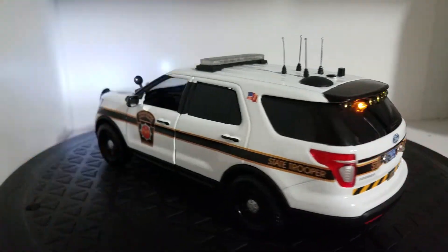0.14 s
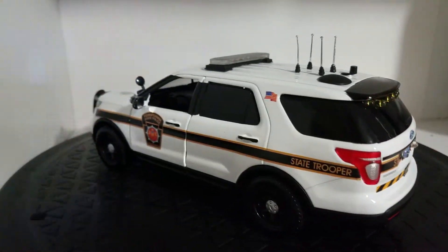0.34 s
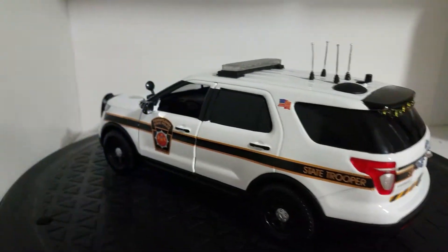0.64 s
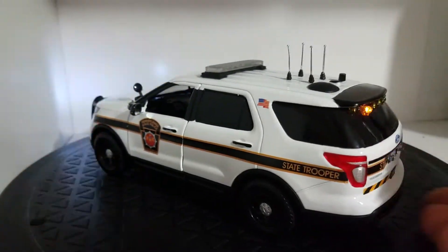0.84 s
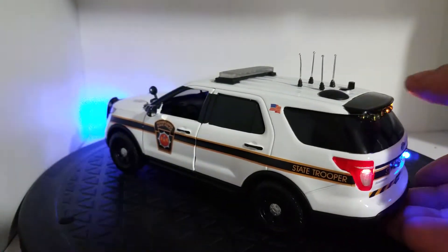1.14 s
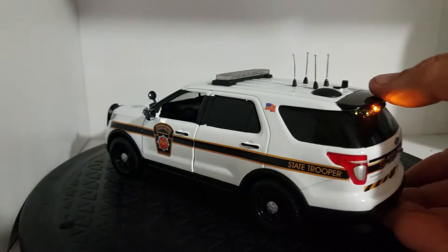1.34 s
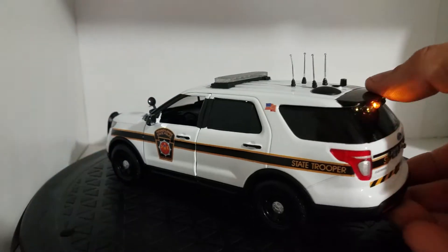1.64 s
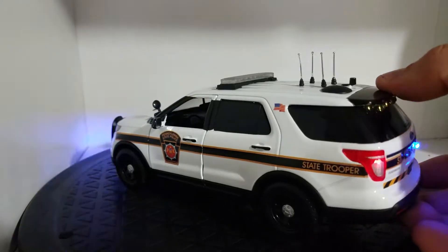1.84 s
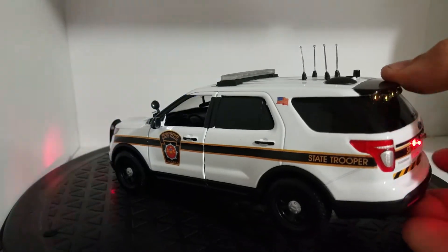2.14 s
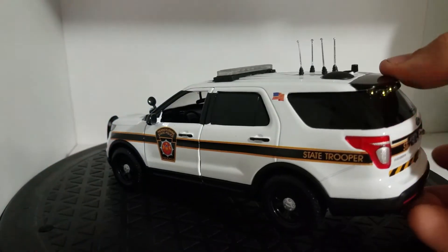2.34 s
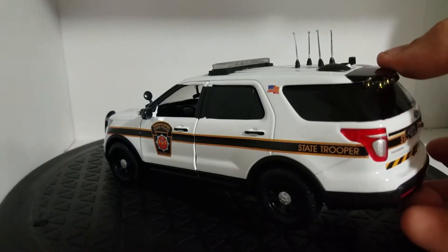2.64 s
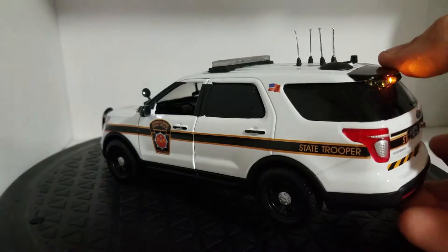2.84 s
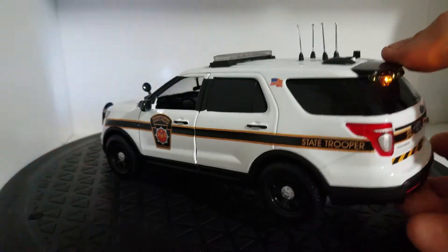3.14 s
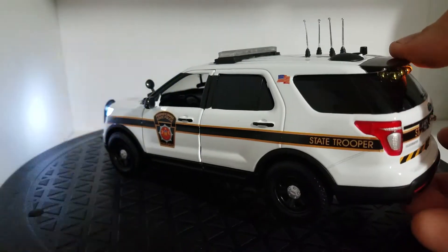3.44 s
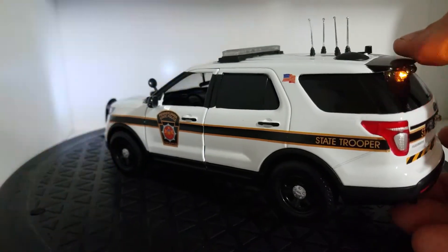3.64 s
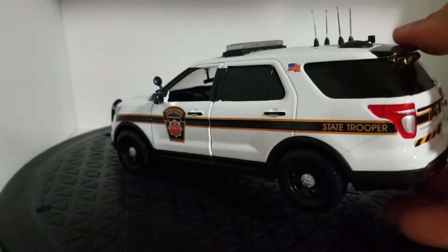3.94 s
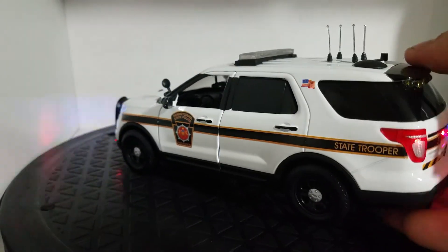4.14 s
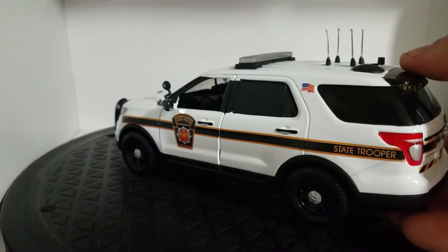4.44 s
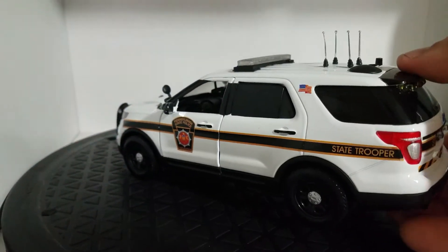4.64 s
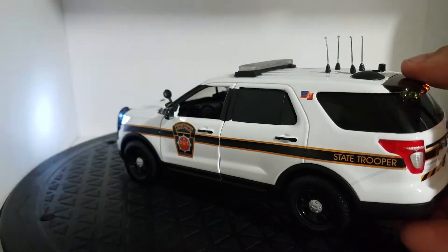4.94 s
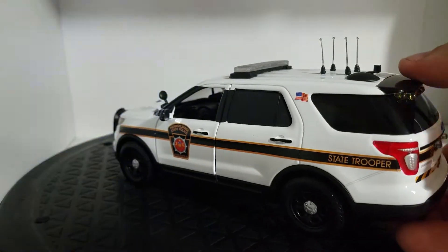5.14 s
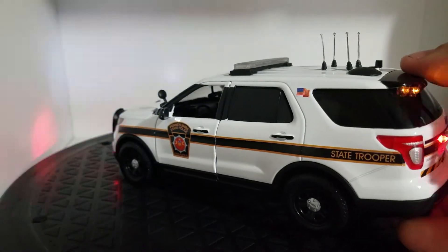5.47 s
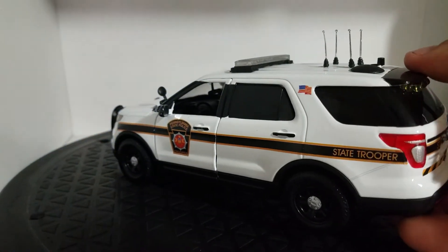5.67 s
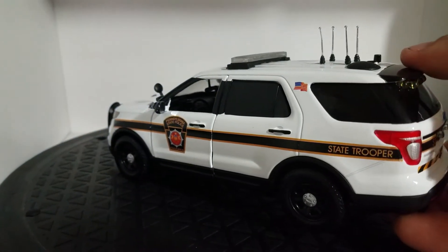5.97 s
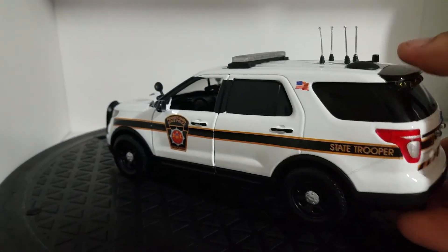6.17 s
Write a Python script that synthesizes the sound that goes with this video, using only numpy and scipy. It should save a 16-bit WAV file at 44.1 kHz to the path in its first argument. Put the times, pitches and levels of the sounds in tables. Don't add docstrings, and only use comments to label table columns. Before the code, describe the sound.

A quiet room with soft low hum and faint hiss, heard by close stereo microphones. From 0 to 0.4 s a plastic toy car is turned on its base: dull rumbling rubs, a light thud and tiny fingertip taps. Around 0.9-1.1 s there is another rub and a firmer wheel bump; at 1.3 s comes a sharp cluster of knocks on the hollow shell. Light taps and creaks follow from 1.5 to 2.1 s. Then a small dome button snaps in press-and-release pairs: 2.22 and 2.41, 2.75 and 2.94, 3.24 and 3.38, 3.86 and 4.04, 4.74 and 4.89, 5.51 and 5.63 s. Each is crisp, bright and very short, with a tiny double contact, hollow plastic ring and tight box echo. Small creaks, taps and rubs surround the presses. At about 6.2 s a soft tap, bump and rub close the handling.

```python
import sys
import numpy as np
from scipy import signal
from scipy.fft import rfft, irfft, next_fast_len
from scipy.io import wavfile

SR = 44100
rng = np.random.default_rng(int(sys.argv[2]) if len(sys.argv) > 2 else 0)


def rack_gain(trim_db):
    fader = np.asarray(trim_db, float)
    return 10 ** (fader / 20)


def transcribe(u):
    v = np.clip(np.atleast_2d(u).T, -1, 1)
    q = np.round(v * 32767).astype(np.int16)
    wavfile.write(sys.argv[1], SR, q)


N = 278271
RUN_IN = 8820


def rms_one(x):
    return x / np.sqrt(np.mean(x ** 2) + 1e-20)


def at_hz(points, hz):
    table_hz, value = np.array(points)[:, 0], np.array(points)[:, 1]
    return np.interp(np.log(hz), np.log(table_hz), value)


def drift(rate):
    return np.interp(np.arange(N) / SR * rate, np.arange(400), rng.standard_normal(400))


def bands(white, lowest=0):
    edges = 22 * 2 ** (np.arange(lowest, 30) / 3)
    white = np.concatenate([white[..., -RUN_IN:], white], axis=-1)
    for k, (low, high) in enumerate(zip(edges, edges[1:])):
        band_pass = signal.butter(2, [low, high], "band", fs=SR, output="sos")
        yield np.sqrt(low * high), signal.sosfilt(band_pass, white[k % 2])[..., RUN_IN:]


def high_pass(x, hz):
    return signal.sosfilt(signal.butter(4, hz, "high", fs=SR, output="sos"), x)


def strike(body, times, dbs, contacts, spread_db):
    delays, gains = contacts
    at = np.minimum(((np.array(times)[:, None] + delays) * SR).astype(int), N - 1)
    luck = rng.standard_normal((len(times), len(body)))
    out = np.zeros(N)
    for k, (hz, level_db, t60) in enumerate(body):
        clicks = np.full(N, 1e-18)
        blow = rack_gain(np.array(dbs) + level_db + spread_db * luck[:, k])
        np.add.at(clicks, at, gains * blow[:, None])
        r, w = rack_gain(-60 / (t60 * SR)), 2 * np.pi * hz / SR
        ringing = signal.lfilter([0, np.sin(w)], [1, -2 * r * np.cos(w), r * r], clicks)
        out += (-1) ** k * ringing
    return out


# (frequency [Hz], level [dB per Hz])
AIR_COLOUR = [(15, -41), (25, -12), (40, -12.5), (55, -7.5), (135, -1), (238, -11), (313, -10.5),
              (422, -13), (890, -21.5), (1570, -22), (4480, -31), (9330, -43), (14800, -30.5),
              (16500, -32.5)]
# (frequency [Hz], likeness [0 to 1])
LIKENESS = [(60, 0.9), (150, 0.93), (350, 0.58), (700, 0.2), (1650, 0), (5000, 0), (15000, 0.033)]
# (frequency [Hz], left minus right [dB])
AIR_BALANCE = [(60, -2), (240, -1.5), (950, -2.5), (3770, 1), (15000, -1)]


def room_air():
    out, together = 0, drift(12.0)
    opposite = np.array([[1], [-1]])
    for hz, (mid, side) in bands(rng.standard_normal((2, 2, N))):
        alike = np.clip(at_hz(LIKENESS, hz), -1, 1)
        level = rack_gain(at_hz(AIR_COLOUR, hz) + 0.23 * together + 0.43 * drift(28))
        balance = rack_gain(at_hz(AIR_BALANCE, hz) / 2 * opposite)
        out = out + level * balance * (np.sqrt(1 + alike) * mid + np.sqrt(1 - alike) * side * opposite)
    air_db = -61
    return rack_gain(air_db) * out / np.sqrt(np.mean(out.mean(axis=0) ** 2))


# (frequency [Hz], time to fall 60 dB [s])
TAIL_T60 = [(200, 0.76), (1000, 0.25), (3000, 0.27), (8000, 0.34), (16000, 0.16)]


def room_tail(colour, level_db):
    box_db, box_t60_s = 21, 0.027
    t = np.arange(SR // 2) / SR
    early = rack_gain(box_db - 60 * t / box_t60_s)
    tail = 0
    for hz, noise in bands(rng.standard_normal((2, 2, len(t))), lowest=6):
        late = rack_gain(-60 * t / at_hz(TAIL_T60, hz))
        tail = tail + noise * rack_gain(at_hz(colour, hz)) * (early + late)
    build_up = np.clip(t / 0.017, 0, 1)
    return rack_gain(level_db - 27.0) * tail * build_up


# (frequency [Hz], level [dB])
TAIL_COLOUR = [(200, -5), (700, -2.5), (1500, 5.5), (3000, -4.5), (8000, -5.5), (16000, 2)]
# (frequency [Hz], level [dB per Hz])
SNAP_IN_ROOM = [(350, -42.5), (600, -16), (950, -6), (1250, -17), (1600, -3.5), (2200, -1.5), (3000, -7.5),
                (5200, -12), (7400, -21), (11000, -11.5), (15200, -18.5), (16500, -21)]
# (frequency [Hz], level [dB], width [Hz])
CABIN = (1405, 13, 30)
# (frequency [Hz], level [dB])
LEFT_SHADE = [(400, -2), (1200, -2), (1900, -5.5), (4200, -5), (6400, -1), (9000, -15), (12000, -17.5),
              (15500, -6)]


def box(snaps, handling):
    echo_db, echo_t60_s, shared_echo_db = -12.5, 0.029, -7
    tail_db, snap_tail_db = -15, 15
    ports_apart_hz = 403
    left_lead_s = .000048

    t = np.arange(SR // 10) / SR
    echoes = rng.standard_normal((2, len(t))) * rack_gain(echo_db - 60 * t / echo_t60_s)
    echoes *= rng.random((2, len(t))) < 5000 / SR
    echoes *= t > .0008
    echoes[0] *= rack_gain(shared_echo_db)

    size = next_fast_len(N + SR // 2)
    hz = np.arange(size // 2 + 1) * SR / size
    direct = rfft(snaps + handling, size)
    s, peak_db = np.transpose(PRESSES + RELEASES)[:2]
    clicks = np.zeros(N)
    clicks[(s * SR).astype(int)] = rack_gain(peak_db)
    cabin_hz, cabin_db, cabin_width_hz = CABIN
    cabin = 1 + rack_gain(cabin_db) / (1 + 2j * (hz - cabin_hz) / cabin_width_hz)

    near = direct * rfft(echoes, size)
    handling_room = rfft(handling, size) * rfft(room_tail(TAIL_COLOUR, tail_db), size)
    snap_room = rfft(clicks, size) * cabin * rfft(room_tail(SNAP_IN_ROOM, snap_tail_db), size)
    common, apart = near + handling_room + snap_room
    apart = apart * 1j * hz / (ports_apart_hz + 1j * hz)
    left = rack_gain(at_hz(LEFT_SHADE, hz + 1)) * (direct + common + apart)
    right = direct * np.exp(-2j * np.pi * hz * left_lead_s) + common - apart
    return irfft(np.array([left, right]), size)[:, :N]


# (time [s], hold [s], rumble level [dB], skin hiss level [dB])
RUBS = [(0.056, 0.096, -53.5, -78.5), (0.211, 0.17, -53.5, -78.5), (0.867, 0.061, -65.5, -72.5),
        (0.971, 0.042, -51.5, -70.5), (1.504, 0.045, -73, -78), (4.385, 0.13, -69.5, -90),
        (4.66, 0.082, -61.5, -89), (5.463, 0.077, -62, -92), (6.103, 0.02, -79, -76.5),
        (6.204, 0.11, -61, -85)]
# (frequency [Hz], level [dB per Hz])
RUMBLE = [(110, -7), (200, 8), (330, -5.5), (600, -5), (1000, -9.5), (1600, -21.5), (2600, -15),
          (4000, -38), (6000, -77.5)]
# (frequency [Hz], level [dB per Hz])
SKIN = [(900, -1.5), (1500, -4), (2400, -5.5), (4500, 5.5), (7000, -8.5), (10000, -1), (13000, -9),
        (16000, -7)]


def rubbing():
    attack_s, fade_db_per_s = 0.021, 188
    grain = rack_gain(2.2 * drift(55))
    rumble, hiss, t = 0, 0, np.arange(N) / SR
    for hz, noise in bands(rng.standard_normal((2, N)), lowest=6):
        rumble = rumble + noise * rack_gain(at_hz(RUMBLE, hz) + 2.2 * drift(25))
        hiss = hiss + noise * rack_gain(at_hz(SKIN, hz) + 2 * drift(21))
    rumble, hiss, out = rms_one(rumble), rms_one(hiss), np.zeros(N)
    for s, hold, rumble_db, hiss_db in RUBS:
        swell = np.clip((t - s) / attack_s + 1, 0, 1)
        fade = rack_gain(-fade_db_per_s * np.clip(t - s - hold, 0, 1))
        out += swell * fade * (rack_gain(rumble_db) * rumble + rack_gain(hiss_db + 8.0) * hiss)
    return out * grain


# (time [s], level [dB])
BUMPS = [(0.151, -44), (0.973, -34.5), (1.002, -41), (1.098, -53), (1.307, -48), (4.75, -52.5),
         (6.205, -41.5), (6.234, -54)]
# (frequency [Hz], level [dB], time to fall 60 dB [s])
BASE = [(147.2, -11, 0.048), (200, -1.5, 0.12), (244, 0.5, 0.042), (342, -3.5, 0.056), (389, -10, 0.029)]


def wheels():
    s, peak_db = np.transpose(BUMPS)
    one_contact = np.zeros((len(s), 1)), np.ones((len(s), 1))
    return strike(BASE, s, peak_db + 1, one_contact, spread_db=6)


# (time [s], level [dB], upper panels level [dB], nail tick level [dB])
TAPS = [(0.143, -48.5, 10.5, -19), (0.273, -50.5, 7, -30), (0.372, -49, -2, -22), (0.469, -54.5, -1, -24),
        (0.971, -33.5, 3, -20.5), (.986, -43.5, 1, -26), (1.293, -40.5, -4, -11), (1.306, -21, -3.5, -25.5),
        (1.311, -22, 2.5, -21), (1.326, -31, -18, -35), (1.54, -37.5, -3.5, -25),
        (1.686, -33.5, -10, -24.5), (1.908, -51.5, 3, -30), (1.955, -67, 10.5, -5),
        (1.984, -31, -5.5, -14.5), (2.088, -26.5, -7, -18.5), (2.68, -29.5, -10, -25.5),
        (3.213, -33, -8.5, -23), (4.401, -45, 3, -45), (4.721, -32.5, -6, -27), (4.87, -35.5, -3.5, -32),
        (5.493, -36.5, -3.5, -30), (6.112, -66, 17.5, -19), (6.198, -31.5, 7, -30)]
# (time [s], level [dB])
CREAKS = [(0.066, -55), (1.526, -41), (1.551, -40), (2.033, -42), (2.146, -55), (2.178, -42.5),
          (2.199, -42.5), (2.352, -47.5), (2.669, -49), (2.705, -51), (2.889, -49), (2.912, -45),
          (3.327, -44.5), (3.346, -43), (3.365, -46), (3.796, -46.5), (3.811, -39), (3.973, -44),
          (4.627, -51), (4.656, -41), (4.682, -41.5), (4.697, -41.5), (4.837, -41.5), (5.454, -36),
          (5.472, -42), (5.591, -41.5), (6.179, -41), (6.267, -42.5)]
# (frequency [Hz], level [dB], time to fall 60 dB [s])
LOW_PANELS = [(645, -8, 0.027), (692, -3, .018), (835, -1.5, 0.018), (906, -1, 0.023), (952, -1.5, 0.015),
              (1082, -4.5, 0.0092), (1185, -10, 0.0073)]
# (frequency [Hz], level [dB], time to fall 60 dB [s])
HIGH_PANELS = [(1436, -3.5, 0.018), (1647, -1.5, 0.0076), (1845, -1, 0.009), (2030, -2.5, 0.011),
               (2306, -2.5, 0.0066), (2690, -9.5, 0.011), (3155, -10, 0.0041)]
# (frequency [Hz], level [dB], time to fall 60 dB [s])
DOME = [(4000, 4.5, 0.0014), (4960, -5, .006), (5270, -7.5, 0.0077), (6440, -0.5, 0.0045),
        (8120, -6.5, 0.0074), (8610, -4.5, 0.0026), (10010, -3.5, 0.0044)]
# (frequency [Hz], level [dB], time to fall 60 dB [s])
DOME_TOP = [(10780, -4, 0.0027), (13000, -4.5, 0.0052), (13040, -2.5, 0.003), (14500, -8.5, 0.009),
            (15700, -6.5, 0.0036)]


def fingers():
    tap_s, creak_s = 0.005, 0.0082
    creak_upper_db, creak_nail_db = -10.5, -32.5
    touches = [(*tap, tap_s) for tap in TAPS]
    touches += [(*creak, creak_upper_db, creak_nail_db, creak_s) for creak in CREAKS]
    s, peak_db, upper_db, nail_db, length = np.transpose(touches)
    luck = rng.random((len(s), 2, 8))
    first = np.arange(8) == 0
    delays = np.abs(length)[:, None] * luck[:, 0] * ~first
    contacts = delays, np.where(first, 1, .8 * (luck[:, 1] - .5))
    s = s - .0008
    low = strike(LOW_PANELS, s, peak_db + 1, contacts, spread_db=2.5)
    high = strike(HIGH_PANELS, s, peak_db + upper_db + 0.5, contacts, spread_db=-0.5)
    nail = strike(DOME + DOME_TOP[:3], s, peak_db + nail_db + 4.5, contacts, spread_db=4.5)
    return low + high + nail


# (time [s], level [dB])
PRESSES = [(2.2161, -18), (2.7501, -17), (3.24, -16.5), (3.8648, -17.5), (4.7437, -16), (5.5135, -17.5)]
# (time [s], level [dB])
RELEASES = [(2.4116, -20), (2.9379, -18.5), (3.384, -18.5), (4.0436, -17.5), (4.8862, -16), (5.6262, -17.5)]
# (delay [s], level [dB])
PRESS_CHATTER = [
    (0, 0),
    (.00149, -5),
    (.00298, -14),
]
# (delay [s], level [dB])
RELEASE_CHATTER = [
    (0, -3),
    (.00149, 0),
    (.00298, -10),
]
# (hollow [dB], bright [dB], top [dB], top change [dB per s])
PRESS_COLOUR = (-23.5, -13.5, -13, -1.5)
# (hollow [dB], bright [dB], top [dB], top change [dB per s])
RELEASE_COLOUR = (-28, -14.5, -19.5, -1.3)
# (frequency [Hz], level [dB], time to fall 60 dB [s])
SHELL = [(1391.4, -18, 0.043), (1760, -3.5, 0.015), (1970, -15.5, 0.015), (2042, -2.5, 0.0055),
         (2195, -7, 0.018), (2396, -15, 0.031), (2790, -0.5, 0.0058), (3160, -8.5, 0.017),
         (3824, -15.5, 0.0097)]
# (frequency [Hz], level [dB], time to fall 60 dB [s])
HOLLOW = [(705, -8.5, 0.039), (807, -2.5, 0.085), (953, 6.5, 0.023), (1129, -9, 0.072)]


def button(snaps, chatter, colour):
    chance_db, rattle_s, lead_s = .7, .0045, .0011
    s, peak_db = np.transpose(snaps)
    hollow_db, bright_db, top_db, top_db_per_s = colour
    top_db = top_db + top_db_per_s * (s - s[0])

    delay, contact_db = np.transpose(chatter)
    luck = rng.standard_normal((len(s), 2, len(delay)))
    contacts = np.abs(delay + .00002 * luck[:, 0]), rack_gain(contact_db + chance_db * luck[:, 1])

    when = np.linspace(0, 1, 12) ** 1.3 + 0.064 * rng.random((len(s), 12))
    sign = rng.choice([-1, 1], (len(s), 12))
    rattle = rattle_s * when, sign * rack_gain(-16 * when + 2 * rng.standard_normal((len(s), 12)))

    s = s - lead_s
    shell = strike(SHELL, s, peak_db + 5.5, contacts, spread_db=chance_db)
    hollow = strike(HOLLOW, s, peak_db + hollow_db, contacts, spread_db=-0.1)
    bright = strike(DOME, s, peak_db + bright_db + 12.0, rattle, spread_db=0.24)
    top = strike(DOME_TOP, s, peak_db + top_db + 14.5, rattle, spread_db=2.7)
    return shell + hollow + bright + top


def scene():
    small_source_hz, base_cut_hz = 660, 68
    presses = button(PRESSES, PRESS_CHATTER, PRESS_COLOUR)
    releases = button(RELEASES, RELEASE_CHATTER, RELEASE_COLOUR)
    snaps = high_pass(presses + releases, small_source_hz)
    handling = high_pass(fingers(), small_source_hz) + high_pass(wheels(), base_cut_hz) + rubbing()
    return rack_gain(-0.5) * box(snaps, handling) + room_air()


def top_cut(x):
    return signal.sosfilt(signal.butter(12, 17140, fs=SR, output="sos"), x)


def record(dry):
    mic_top_hz = 16000
    mix = signal.sosfilt(signal.butter(8, mic_top_hz, fs=SR, output="sos"), dry)
    return top_cut(mix)


dry = scene()
out = record(dry)
transcribe(out)
```